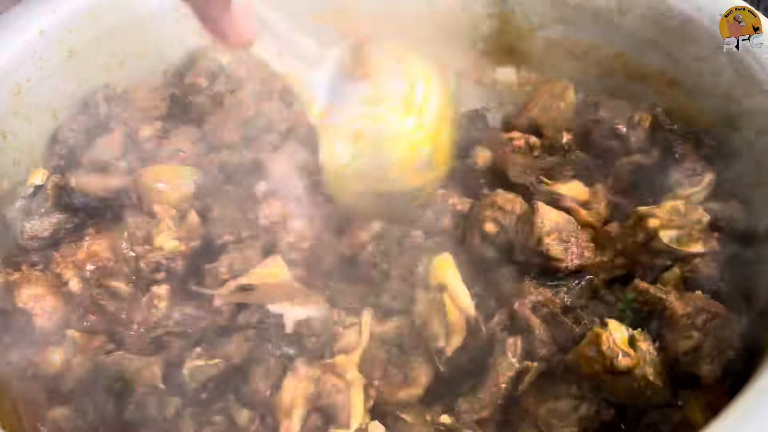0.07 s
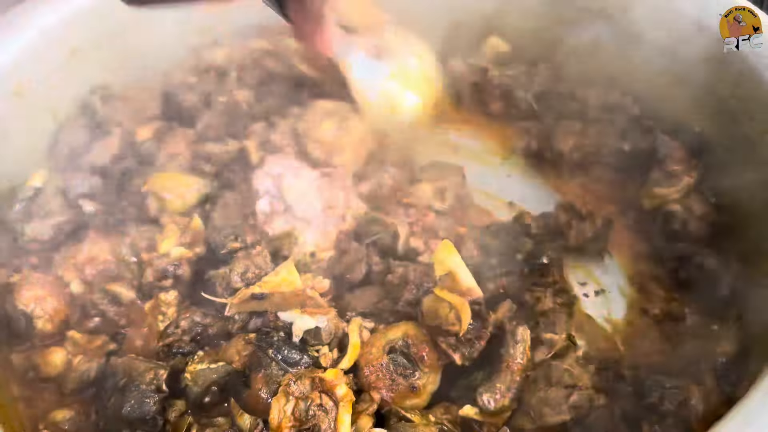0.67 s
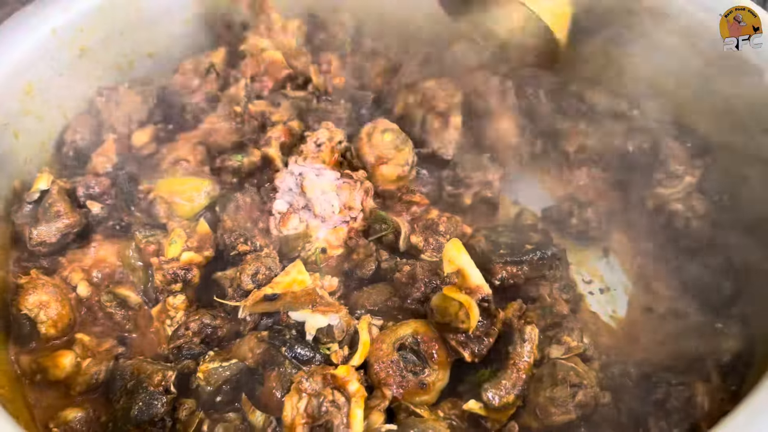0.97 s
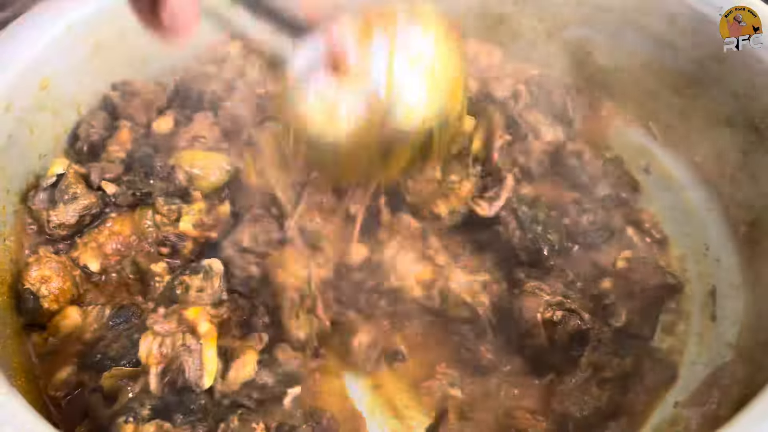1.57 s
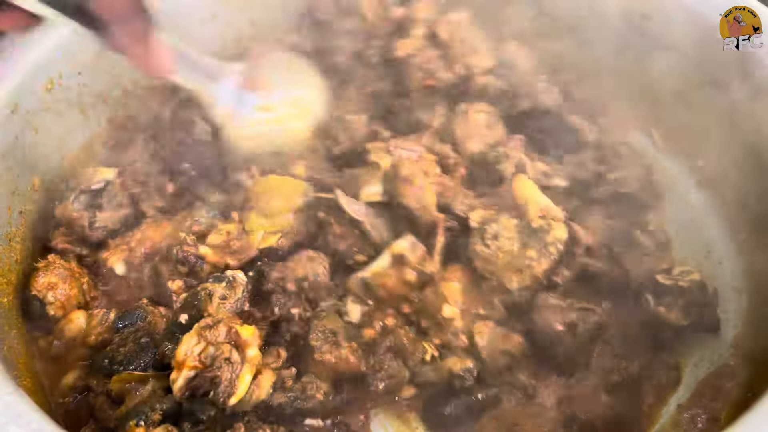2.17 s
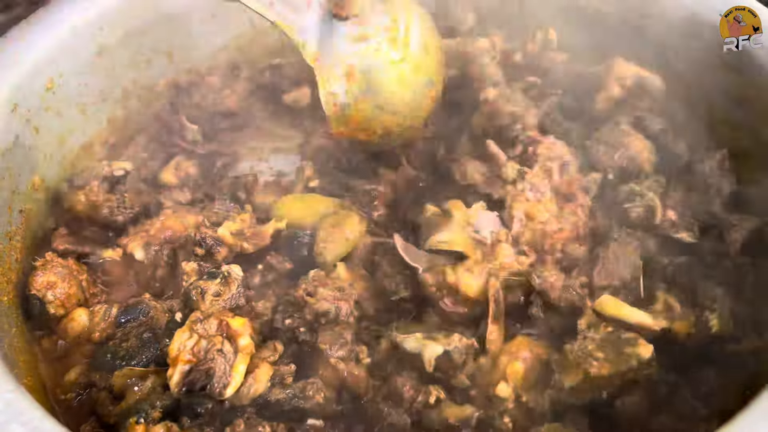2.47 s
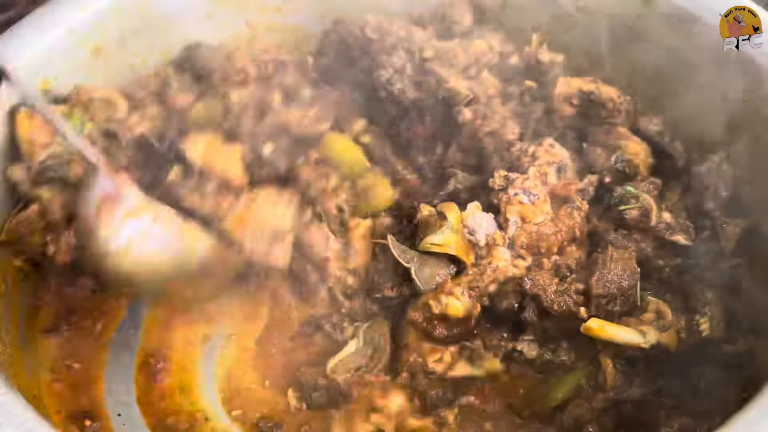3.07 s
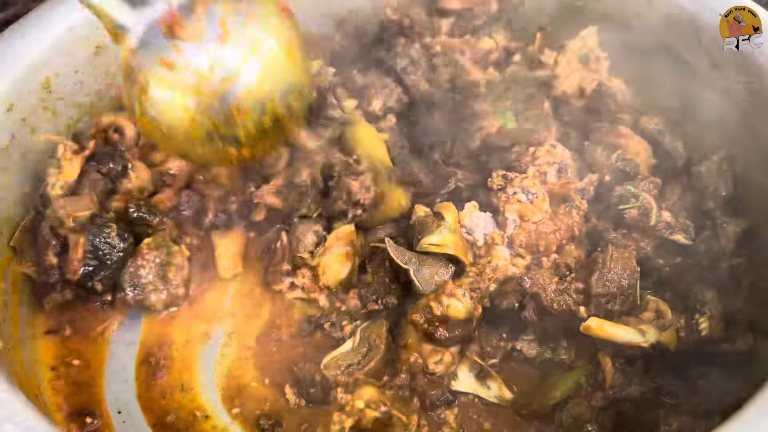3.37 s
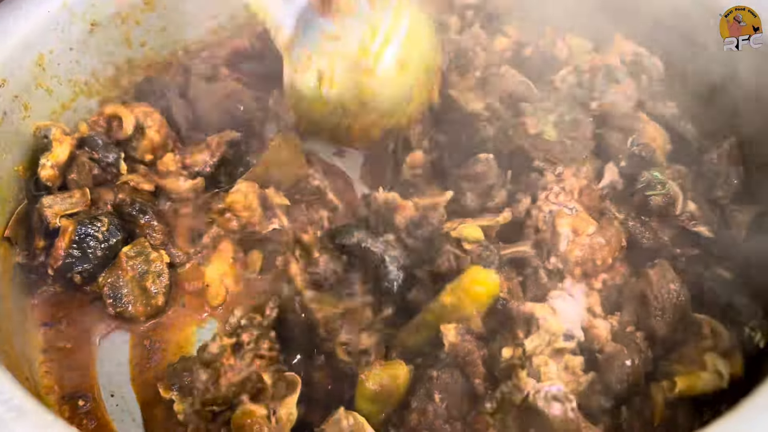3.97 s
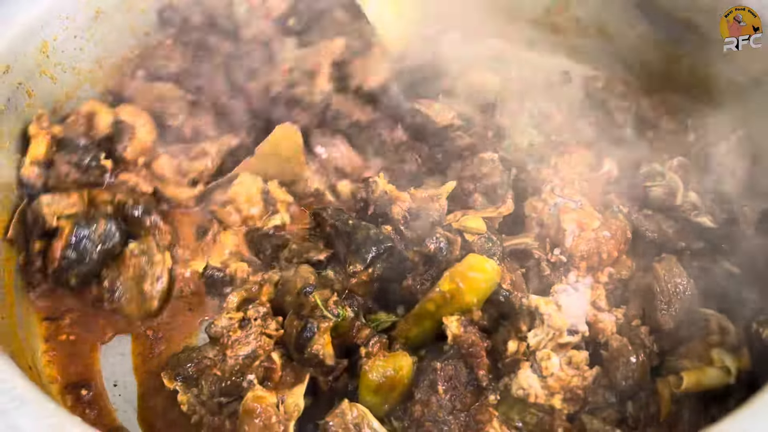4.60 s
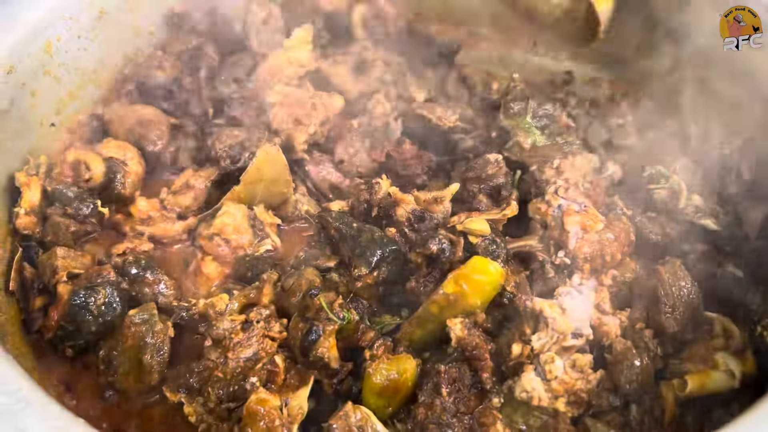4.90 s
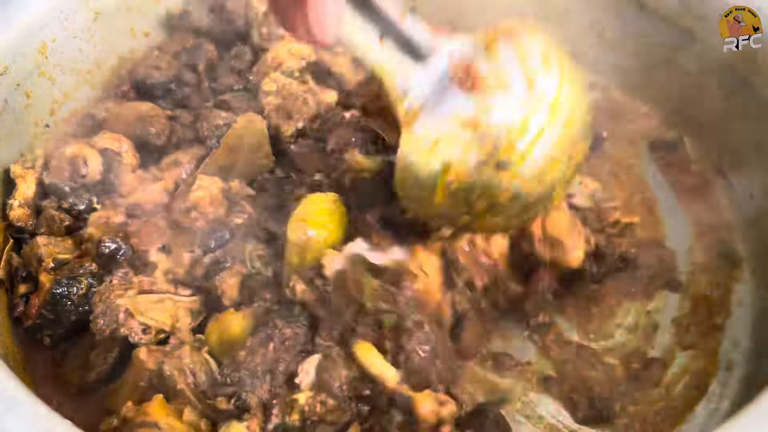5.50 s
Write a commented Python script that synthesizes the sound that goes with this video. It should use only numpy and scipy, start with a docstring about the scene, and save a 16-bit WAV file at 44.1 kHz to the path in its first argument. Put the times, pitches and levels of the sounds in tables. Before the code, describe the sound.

A metal ladle stirs thick meat curry in a large metal pot, outdoors, close to the microphone. A soft sizzle with small pops runs throughout, freshening with each stroke. Light knocks and a short scrape come in the first second. Around 1.1 seconds a stronger knock leads into scraping and dull bumps of meat and bone. At 2 seconds the ladle taps the wall with a clear ring, followed by a squeaky scrape. A heavy, damped knock and another scrape come at 2.7 seconds, then a sharp clink and a gritty, squealing stroke at 3.7. Further knocks with scrapes fall at about 4.3 and 5.1 seconds. From about 3.4 seconds a very faint low hum sounds in the distance, and from 4.3 seconds to the end a small bird gives quick, high peeps that slide down and up.

```python
"""A metal ladle stirs thick meat curry in a big metal pot, outdoors, close to the microphone.
Strokes start with a knock, then scrape along the metal and shove bones and meat against the floor.
Curry damps the ring; once the ladle taps the wall and rings free. Its edge sticks, slips and squeals.
Steam bursts in the oil as a soft sizzle. Late on, a small bird peeps and something hums far away."""
import sys
import numpy as np
from scipy import signal
from scipy.fft import rfft, irfft, next_fast_len
from scipy.io import wavfile
from scipy.ndimage import uniform_filter1d

SR = 44100
rng = np.random.default_rng(int(sys.argv[2]) if len(sys.argv) > 2 else 0)


def store_wav(level_fs):
    """Save 16-bit WAV to argv[1]."""
    pcm = np.round(np.clip(np.atleast_2d(level_fs), -1, 1) * 32767)
    wavfile.write(sys.argv[1], SR, pcm.T.astype(np.int16))


N = 253266
TIME_S = np.arange(N) / SR

# Table levels are relative, ahead of the mix gains.
# ladle on pot: start_s, thump_end_hz, thump_db, pot_db, ring_db, crack_db, t60_share, lowpass_hz, node_hz
KNOCKS = [(0.013, 300, -23, -47, -21.5, -39, 0.062, 4000, 890),
          (0.3689, 216, -21.5, -26.5, -31.5, -20, 0.51, 2300, 1550),
          (0.6051, 417, -26.5, -56, -37, -34, 0.078, 2000, 900),
          (.665, 450, -44, -50, -34.5, -36, 0.072, 3000, 1980),
          (1.092, 390, -27.5, -39, -34.5, -29, 0.52, 2500, 2030),
          (1.1197, 343, -11, -39, -20.5, -13.5, 0.13, 2980, 1920),
          (1.19, 527, -29, -50, -24.5, -24, 0.46, 1110, 2000),
          (1.262, 480, -34, -50, -26, -37, 0.1, 1600, 2000),
          (1.2693, 480, -39, -43, -23, -28, 0.21, 1200, 1950),
          (1.2805, 444, -35, -38, -37, -44, 0.089, 1900, 900),
          (1.9761, 168, -23.5, -45, -11, -10.5, 1, 7340, 710),
          (2.1297, 169, -25, -49, -21.5, -15, 0.05, 5500, 1420),
          (2.7283, 600, -34, -23, -23, -30, 0.26, 1100, 1470),
          (2.7297, 219, -10, -14, -15, -29, 0.39, 1110, 2600),
          (3.6949, 168, -22, -39, -23.5, -12, 0.19, 5900, 1450),
          (3.773, 540, -27.5, -33.5, -25, -36, 0.12, 1200, 2100),
          (4.3044, 340, -17.5, -32.5, -27, -22, 0.2, 1600, 3500),
          (5.0815, 298, -27.5, -33, -39, -37, 0.22, 1400, 1320)]
# ladle and pot ringing together: mode_hz, level_db, free_t60_s
METAL_MODES = [(640, -6, .025), (897, -4, .19), (1437, -1.5, .16), (1630, -6, .045), (1781, -1, .17),
               (2025, -1, .22), (2218, -5, .16), (2330, -8, .04), (2440, -6.5, .14), (2563, 0, .2),
               (2660, -13, .2), (2838, -4.5, .26), (2910, -8, .12), (3110, -11, .08), (3189, -6, .1),
               (3350, -12, .1), (3503, -9, .11), (3620, -8, .06), (3770, -12, .07), (3850, -9, .07),
               (4050, -1, .035), (4221, -5, .1), (4500, -10, .07), (5222, -9, .11), (5275, -7, .065),
               (5950, 0, .025), (6545, -2, .04), (7850, -7, .04)]
# ladle strokes: start_s, length_s, drag_db, ring_db, grit_db, swell_db, sizzle_db
STROKES = [(0.52, 0.17, -39.5, -36.5, -44.5, -5, -44.5), (1.033, 0.26, -42, -36.5, -45, 3.5, -43),
           (1.312, 0.11, -45.5, -35.5, -41, 8.5, -45), (2.134, 0.138, -34, -32.5, -34.5, -1, -50),
           (2.76, 0.21, -42.5, -37.5, -41.5, -2.5, -48), (3.569, 0.11, -45.5, -42.5, -61, 0.5, -42),
           (3.7, 0.094, -35, -36, -31.5, -2, -49.5), (4.298, 0.19, -37, -34, -45, -3.5, -43.5),
           (5.08, 0.23, -39, -38.5, -43.5, -8.5, -44.5)]
# edge biting through to bare metal: peak_s, length_s, ring_db, grit_db
BITES = [(0.446, 0.097, -40.5, -45.5), (1.18, 0.022, -27.5, -39.5), (1.246, 0.063, -32, -36),
         (1.406, 0.042, -42, -25), (2.155, 0.039, -19.5, -33.5), (2.257, 0.027, -23, -29.5),
         (2.776, 0.12, -30, -46), (2.806, 0.038, -28.5, -32.5), (2.938, 0.032, -38, -36.5),
         (3.739, 0.12, -35, -38), (3.787, 0.04, -28, -46), (5.218, 0.05, -30.5, -38),
         (5.28, 0.078, -38, -41)]
# high resonances of the ladle bowl: mode_hz, width_hz, level_db
BOWL_MODES = [(1840, 120, -10), (2490, 130, -8), (2696, 210, -16.5), (3280, 360, -4.5), (3730, 31, 5.5),
              (3976, 86, 2), (4660, 29, 5), (5530, 85, 7), (6040, 480, 1.5), (6720, 480, -6),
              (7560, 170, 0.5), (7900, 61, 0.5), (8700, 270, -4), (9640, 770, -4), (11170, 340, -13),
              (11880, 140, -19), (11800, 1000, -5.5)]
# scrape spectra, curry and crust: freq_hz, density_db
DRAG_SPECTRUM = [(120, -14.5), (250, 2.5), (380, -3), (500, 11.5), (650, 6.5), (900, 4), (1300, -35),
                 (2500, -18)]
GRIT_SPECTRUM = [(1500, -20), (2500, -33), (3200, -14), (4400, -4), (6000, 14), (8000, -47), (10000, -18),
                 (13000, 31), (15500, 27)]
# edge stick-slip: start_s, length_s, start_hz, end_hz, width_hz, level_db
SQUEALS = [(1.314, 0.031, 5130, 4800, 400, -28.5), (1.391, 0.039, 4000, 4040, 300, -29.5),
           (1.392, 0.032, 1840, 1840, 202, -29.5), (2.147, 0.016, 1915, 1930, 300, -25),
           (2.138, 0.015, 4090, 3980, 220, -23.5), (2.145, 0.014, 6300, 6080, 200, -28),
           (2.169, 0.041, 1740, 1547, 150, -28), (2.18, 0.097, 5110, 4360, 334, -27.5),
           (2.201, 0.075, 7950, 7900, 300, -33), (2.75, 0.226, 2040, 2010, 40, -45),
           (2.841, 0.14, 3300, 3260, 119, -40.5), (3.695, 0.092, 5270, 4600, 380, -22.5),
           (3.727, 0.04, 1760, 1790, 100, -32), (3.729, 0.051, 8700, 7670, 700, -27.5),
           (2.985, 0.13, 3350, 3600, 450, -50), (3.799, 0.061, 2480, 2440, 100, -43.5),
           (4.445, 0.03, 3350, 3280, 100, -37.5), (4.464, 0.053, 3280, 3280, 100, -50)]
# bones and meat on the pot floor: start_s, end_hz, level_db
BUMPS = [(.451, 340, -36), (.498, 330, -40), (0.516, 154, -25), (0.548, 400, -31.5), (.617, 408, -30),
         (0.633, 390, -28), (1.057, 312, -19.5), (1.147, 430, -28), (1.167, 378, -27), (1.2, 388, -17.5),
         (1.221, 410, -29), (1.294, 407, -35), (2.736, 172, -20.5), (2.812, 366, -31.5), (4.422, 392, -32),
         (4.44, 393, -32.5)]
# snaps and pops in the curry: start_s, level_db
SNAPS = [(.486, -52), (.594, -37), (.618, -40), (1.032, -43), (1.171, -52), (1.095, -27), (1.331, -46),
         (1.482, -52), (1.607, -38), (1.808, -51), (2.187, -31), (2.247, -25), (2.864, -30), (3.013, -38),
         (3.17, -41), (3.254, -46), (3.727, -21), (3.763, -24), (4.623, -54), (5.03, -39), (5.118, -30.5),
         (5.291, -32)]
# cooking spectra, steam and bubbling: freq_hz, density_db
SIZZLE_SPECTRUM = [(900, -4), (1800, -4), (3000, 1), (4500, -0.5), (6300, 5), (8000, 2.5), (10000, 0),
                   (13000, 0.5), (15500, -0.5)]
SIMMER_SPECTRUM = [(130, -3.5), (250, -9), (480, 1), (750, -2.5), (1100, -6.5), (2000, -6), (4000, -10)]
# bird calls: start_s, length_s, slur, level_db
PEEPS = [(4.308, 0.1, "down", -34.5), (4.361, 0.038, "up", -36), (4.674, 0.051, "up", -37.5),
         (4.712, 0.12, "down", -32), (4.954, 0.056, "up", -37), (5.16, 0.12, "down", -31.5),
         (5.249, 0.054, "up", -37.5), (5.607, 0.095, "down", -31.5), (5.69, 0.076, "up", -39.5)]
# bird slurs: glide_s, start_hz, end_hz, bend_exponent
SLUR_DOWN = (.108, 5000, 2370, 2.7)
SLUR_UP = (.052, 2450, 5200, 1.3)
# bird voice strength: pitch_hz, gain_db
THROAT_GAIN = [(2370, -4), (2800, 1.5), (4000, 3.5), (4500, -7), (5200, -1.5)]
# bird hoarseness: pitch_hz, jitter_share
HOARSENESS = [(2370, .003), (3000, .011), (4000, .02), (4600, .035)]
# spells of distant hum: start_s, length_s, level_db
HUMS = [(3.35, 0.83, -52), (4.466, 1.4, -51.5)]
# outdoor rumble: freq_hz, density_db
RUMBLE_SPECTRUM = [(25, -33), (45, -8.5), (64, 1.5), (90, -4), (130, -7), (200, -8), (400, -18.5),
                   (900, -64)]
# level gap of the two microphone ports: freq_hz, left_minus_right_db
PORT_BALANCE = [(60, 23), (200, 3), (400, 17), (520, 16), (650, 21.5), (760, 4.5), (910, 2), (1150, 8),
                (1450, 8.5), (1900, 2.5), (2500, 1.5), (4400, 2), (6000, 0), (8000, 0)]
# phase gap of the ports: freq_hz, left_lead_rad
PORT_PHASE = [(100, 0), (280, -.3), (400, 1.5), (700, 2.0), (820, 2.9), (910, 4.7), (1500, 4.7),
              (2000, 4.6), (2400, 3.8), (3200, 4.6), (4100, 4.6), (5100, 3.0), (8600, .2), (13000, -.1),
              (16000, -2.5)]


def knocks(pot_hz=913.5, pot_t60_s=0.049, crack_hz=5800, crack_s=0.0022, chatter=0.009, node_depth=.85):
    """Ladle strikes pot: metal ring, contact crack, thump and the floor's own tone."""
    out, t = np.zeros(N), TIME_S[:SR // 3]
    pot_tone = np.sin(2 * np.pi * pot_hz * t) * from_db(-60 * t / pot_t60_s) * np.minimum(t / .002, 1)
    for start_s, end_hz, thump_db, pot_db, ring_db, crack_db, t60_share, lowpass_hz, node_hz in KNOCKS:
        contact = rng.standard_normal((2, len(t))) * np.exp(-t / crack_s)
        force = (t == 0) + chatter * contact[0]
        # a cushioned blow wakes only the low modes
        ring = butter(metal(force, t60_share), lowpass_hz, "low")
        # a mode struck near its node rings weakly
        ring -= node_depth * resonance(ring, node_hz)
        crack = butter(contact[1], [2400, 12500], "band")
        crack += 2 * resonance(crack, crack_hz)  # colour of the ladle's edge
        add(out, start_s, at_peak_level(ring, ring_db) + at_peak_level(crack, crack_db - 4.5))
        add(out, start_s + 0.0009, thump(start_hz=790, end_hz=end_hz, level_db=thump_db))
        add(out, start_s, at_peak_level(pot_tone, pot_db))
    return out


def metal(force, t60_share):
    """Ladle and pot modes; curry cuts their ring time to a share of the free one."""
    out = 0
    for k, (mode_hz, level_db, free_t60_s) in enumerate(METAL_MODES):
        radius = from_db(-60 / (free_t60_s * t60_share * SR))
        step_rad = 2 * np.pi * mode_hz / SR
        poles = [1, -2 * radius * np.cos(step_rad), radius ** 2]
        mode = signal.lfilter([0, np.sin(step_rad)], poles, force + 1e-18)
        out += (-1) ** k * from_db(level_db) * mode
    return out


def thump(start_hz, end_hz, level_db, rise_s=0.0017, glide_s=0.0028, roughness=0.34, highpass_hz=145):
    """Bending waves in the pot floor: high ones arrive first, so the pitch falls."""
    t = TIME_S[:SR // 12]
    pitch_hz = end_hz + (start_hz - end_hz) * np.exp(-t / glide_s)
    crunch = unit_rms(butter(rng.standard_normal(len(t)), [end_hz, 2 * start_hz], "band"))
    wave = np.sin(phase_rad(pitch_hz)) + roughness * crunch
    pulse = wave * t * np.exp(-t / rise_s)
    return at_peak_level(steep_highpass(pulse, highpass_hz), level_db)


def scraping():
    """Tiny slips in uneven clumps shake the curry, the metal and its crust."""
    drag_gain, ring_gain, grit_gain = stroke_gains()
    judder = from_db(2 * drift(rate_hz=170))
    lumps = from_db(2 * drift(rate_hz=50))
    drag = drag_gain * lumps * coloured(grains(per_s=240, spread_db=0.53) * judder, DRAG_SPECTRUM)
    slips = grains(per_s=6000, spread_db=2.3) * judder
    ring = ring_gain * from_db(-3.5) * unit_rms(butter(metal(slips, t60_share=0.13), 3700, "low"))
    crust = grit_gain * from_db(-4) * coloured(slips, GRIT_SPECTRUM)
    rasp = grit_gain * from_db(6.5) * ladle_bowl(slips)
    # upper modes stand clear of the curry and outlast the stroke
    after_ring = metal(grains(per_s=6000, spread_db=1.5) * grit_gain, t60_share=.8)
    after_ring = unit_rms(steep_highpass(after_ring, 2900)) * np.std(rasp) * from_db(-13)
    return drag + ring + crust + rasp + after_ring


def stroke_gains():
    """Drag, ring and grit gains: strokes swell or fade; bites add a surge of ring and grit."""
    power = np.zeros((3, N))
    for start_s, length_s, drag_db, ring_db, grit_db, swell_db, _ in STROKES:
        swell = from_db(swell_db * ramp(start_s, length_s))
        push = swell * held(start_s, length_s, attack_s=0.008, release_s=0.01)
        power += np.outer(from_db([drag_db, ring_db, grit_db]), push) ** 2
    for peak_s, length_s, ring_db, grit_db in BITES:
        surge = np.cos(np.pi * np.clip((TIME_S - peak_s) / length_s, -.5, .5))
        power[1:] += np.outer(from_db([ring_db, grit_db]), surge) ** 2
    return np.sqrt(power)


def ladle_bowl(force, hop_depth=.018, hops_per_s=35):
    """Bowl resonances take turns and hop in pitch as the contact slides along the edge; rms 1."""
    out = 0
    for k, (mode_hz, width_hz, level_db) in enumerate(BOWL_MODES):
        radius = np.exp(-np.pi * width_hz / SR)
        zeros = (1 - radius ** 2) / 2 * np.array([1, 0, -1])
        poles = [1, -2 * radius * np.cos(2 * np.pi * mode_hz / SR), radius ** 2]
        gain = from_db(level_db + 3 * drift(rate_hz=55))
        out += (-1) ** k * gain * signal.lfilter(zeros, poles, force)
    warped_s = TIME_S + hop_depth / hops_per_s * drift(hops_per_s)
    return unit_rms(np.interp(warped_s, TIME_S, out))


def squeals():
    """The edge sticks and slips: rough narrow tones that slide as the contact moves."""
    out = np.zeros(N)
    for start_s, length_s, start_hz, end_hz, width_hz, level_db in SQUEALS:
        progress = ramp(start_s, length_s)
        on = (progress > 0) & (progress < 1)
        phase = phase_rad(start_hz + (end_hz - start_hz) * progress[on])
        sway = butter(rng.standard_normal((2, SR)), width_hz / 2, "low")[:, -len(phase):]
        tone = unit_rms(sway[0] * np.sin(phase) + sway[1] * np.cos(phase))
        envelope = np.sin(np.pi * progress[on]) ** 0.26
        out[on] += from_db(level_db) * envelope * tone
    return out


def bumps(fall_hz=296):
    """Bones and meat hit the pot floor: thump only, no ring."""
    out = np.zeros(N)
    for start_s, end_hz, level_db in BUMPS:
        add(out, start_s, thump(end_hz + fall_hz, end_hz, level_db, rise_s=0.0018, roughness=0.37))
    return out


def snaps(decay_s=0.0028):
    """Grit and bone splinters snap, wet lumps pop: short bright bursts."""
    out, t = np.zeros(N), TIME_S[:SR // 50]
    for start_s, level_db in SNAPS:
        burst = rng.standard_normal(len(t)) * np.exp(-t / decay_s)
        add(out, start_s, at_peak_level(butter(burst, [4500, 13000], "band"), level_db))
    return out


def sizzling(spit_share=.45, spit_decay_s=.0004):
    """Tiny steam bursts in the oil, sparser spits, thick bubbling beneath."""
    steam = grains(per_s=5000, spread_db=2.9) * from_db(drift(rate_hz=70))
    fizz = coloured(steam, SIZZLE_SPECTRUM)
    burst = rng.standard_normal(SR // 200) * np.exp(-TIME_S[:SR // 200] / spit_decay_s)
    spits = coloured(signal.fftconvolve(grains(per_s=45, spread_db=4), burst)[:N], SIZZLE_SPECTRUM)
    bubbles = grains(per_s=2000, spread_db=2.7) * from_db(2 * drift(rate_hz=14))
    simmer = coloured(bubbles, SIMMER_SPECTRUM)
    return from_db(frying_db() + 2.5) * (fizz + spit_share * spits) + from_db(-48.5) * simmer


def frying_db(rise_s=0.15, fade_db_per_s=5.5):
    """Sizzle level: each stroke turns fresh curry onto hot metal, where it dries off."""
    level_db = -45.5 - fade_db_per_s * TIME_S
    for start_s, *_, sizzle_db in STROKES:
        turned = ramp(start_s, rise_s)
        fresh_db = sizzle_db - fade_db_per_s * (TIME_S - start_s - rise_s)
        level_db = (1 - turned) * level_db + turned * fresh_db
    return level_db


def bird(right_lag_s=0.000423):
    """Fast sliding whistles, hoarser at the top; the yard echoes their upper part."""
    out = np.zeros(N)
    jitter, flutter_db = drift(rate_hz=800), 2 * drift(rate_hz=280)
    for start_s, length_s, slur, level_db in PEEPS:
        glide_s, start_hz, end_hz, bend = SLUR_DOWN if slur == "down" else SLUR_UP
        on = (TIME_S > start_s) & (TIME_S < start_s + length_s)
        t = TIME_S[on] - start_s
        pitch_hz = end_hz + (start_hz - end_hz) * np.maximum(1 - t / glide_s, 0) ** bend
        hoarse_hz = pitch_hz * (1 + at_hz(HOARSENESS, pitch_hz) * jitter[on])
        gate = np.minimum(t / .012, 1) * np.minimum((length_s - t) / .006, 1)
        gain = from_db(level_db + at_hz(THROAT_GAIN, pitch_hz) + flutter_db[on])
        out[on] += gain * gate * np.sin(phase_rad(hoarse_hz))
    direct = np.array([out, np.interp(TIME_S - right_lag_s, TIME_S, out)])
    return direct + from_db(2.5) * echoes(steep_highpass(out, 2750), t60_s=0.28, lowpass_hz=13000)


def outdoors(hum_hz=76.3, waver_hz=2.5):
    """Distant wavering hum and low rumble, stronger on the left, over faint air noise."""
    spells = sum(from_db(level_db) * held(start_s, length_s, attack_s=0.068, release_s=0.087)
                 for start_s, length_s, level_db in HUMS)
    tone = unit_rms(np.sin(phase_rad(hum_hz + waver_hz * drift(rate_hz=9.9))))
    hum = spells * from_db(2 * drift(rate_hz=9)) * tone
    rumble = from_db(-55) * coloured(rng.standard_normal(N), RUMBLE_SPECTRUM)
    air = np.array([coloured(rng.standard_normal(N), SIMMER_SPECTRUM) for _ in range(2)])
    return (hum + rumble) * from_db([[1.5], [-1.5]]) + from_db(-61) * air


def echoes(x, t60_s, lowpass_hz):
    """Dense dying reflections, different on each side."""
    t = TIME_S[:SR // 3]
    tails = rng.standard_normal((2, len(t))) * from_db(-60 * t / t60_s) * (t > .001)
    tails /= np.sqrt(np.sum(tails ** 2, axis=1, keepdims=True))
    return signal.fftconvolve(x[None], butter(tails, lowpass_hz, "low"), axes=1)[:, :N]


def spread_out(source, side_db, lowpass_hz):
    """Stereo width: wide in the lows and mids, narrow in the treble."""
    side = from_db(side_db) * butter(source(), lowpass_hz, "low")
    return source() + side * [[1], [-1]]


def microphone_ports(x):
    """Sound reaches the two ports with frequency-dependent level and phase gaps."""
    size = next_fast_len(N + SR // 10)
    hz = np.arange(size // 2 + 1) * SR / size
    balance, lead_rad = from_db(at_hz(PORT_BALANCE, hz)), at_hz(PORT_PHASE, hz)
    response = np.array([balance, np.exp(-1j * lead_rad)]) * np.sqrt(2 / (1 + balance ** 2))
    return irfft(rfft(x, size) * response, size)[:, :N]


def from_db(db):
    """Decibels to gain."""
    return 10 ** (np.asarray(db) / 20)


def unit_rms(x):
    """Scale to rms 1."""
    return x / np.sqrt(np.mean(x ** 2) + 1e-20)


def at_peak_level(x, level_db):
    """Scale the loudest 5 ms to this level."""
    return x * from_db(level_db) / np.sqrt(uniform_filter1d(x ** 2, size=220).max() + 1e-20)


def at_hz(points, hz):
    """Read a curve on a log-frequency axis."""
    freq_hz, value = np.transpose(points)
    return np.interp(np.log(hz + 1), np.log(freq_hz), value)


def coloured(x, spectrum):
    """Apply a spectrum, rolled off past its ends; rms 1."""
    size = next_fast_len(N)
    hz = np.arange(size // 2 + 1) * SR / size
    rolloff = np.minimum(1, hz / spectrum[0][0]) ** 2 / np.maximum(1, hz / spectrum[-1][0]) ** 2
    return unit_rms(irfft(rfft(x, size) * from_db(at_hz(spectrum, hz)) * rolloff, size)[:N])


def butter(x, hz, kind):
    """Causal Butterworth filter, order 2."""
    return signal.sosfilt(signal.butter(2, hz, kind, fs=SR, output="sos"), x)


def steep_highpass(x, hz):
    """Two high-passes in series."""
    return butter(butter(x, hz, "high"), hz, "high")


def resonance(x, hz):
    """Band-pass, Q 4."""
    return signal.lfilter(*signal.iirpeak(hz, 4, fs=SR), x)


def phase_rad(pitch_hz):
    """Running phase of a moving pitch."""
    return 2 * np.pi * np.cumsum(pitch_hz) / SR


def drift(rate_hz):
    """Random wander; rms 1."""
    knots = rng.standard_normal(size=8000)
    return unit_rms(np.interp(TIME_S * rate_hz, np.arange(len(knots)), knots))


def grains(per_s, spread_db):
    """Random clicks of uneven size; rms 1."""
    sizes = from_db(spread_db * np.minimum(rng.exponential(1, N), 4)) * rng.choice([-1, 1], N)
    return unit_rms(sizes * (rng.random(N) < per_s / SR))


def ramp(start_s, length_s):
    """Linear rise from 0 to 1."""
    return np.clip((TIME_S - start_s) / length_s, 0, 1)


def held(start_s, length_s, attack_s, release_s):
    """Envelope: rise, hold, exponential decay."""
    return ramp(start_s, attack_s) * np.exp(-np.maximum(TIME_S - start_s - length_s, 0) / release_s)


def add(track, start_s, sound):
    """Mix a sound in at start_s."""
    start = round(start_s * SR)
    track[start:start + len(sound)] += sound[:N - start]


def scene():
    """Pot with its inner reflections, bird and background, in stereo."""
    struck = knocks() + snaps()
    reflections = from_db(-6) * echoes(butter(struck, 1500, "high"), t60_s=0.035, lowpass_hz=9000)
    scrapes = from_db(-1.5) * spread_out(scraping, side_db=-7.5, lowpass_hz=6500)
    sizzle = spread_out(sizzling, side_db=-5.5, lowpass_hz=6000)
    pot = struck + reflections + bumps() + squeals() + scrapes + sizzle
    return from_db(-1) * microphone_ports(pot) + bird() + outdoors()


def record(dry):
    """Soft peak limit, then a steep low-pass."""
    ceiling, cutoff_hz = .85, 15900
    rounded = dry / (1 + (dry / ceiling) ** 6) ** (1 / 6)
    return signal.sosfilt(signal.ellip(10, .2, 80, cutoff_hz, fs=SR, output="sos"), rounded)


dry = scene()
out = record(dry)
store_wav(out)
```